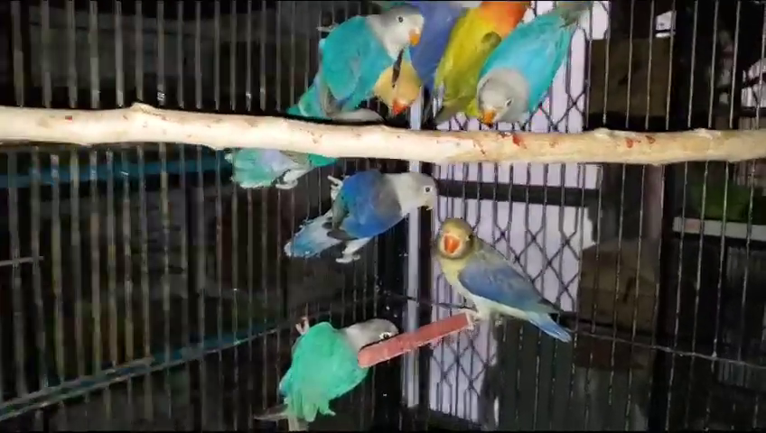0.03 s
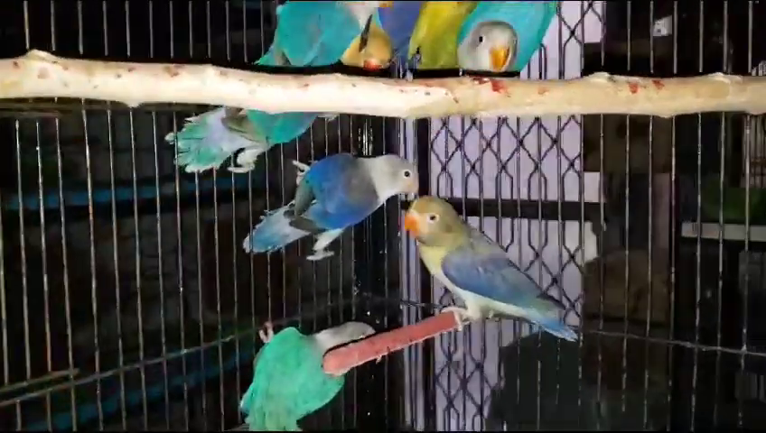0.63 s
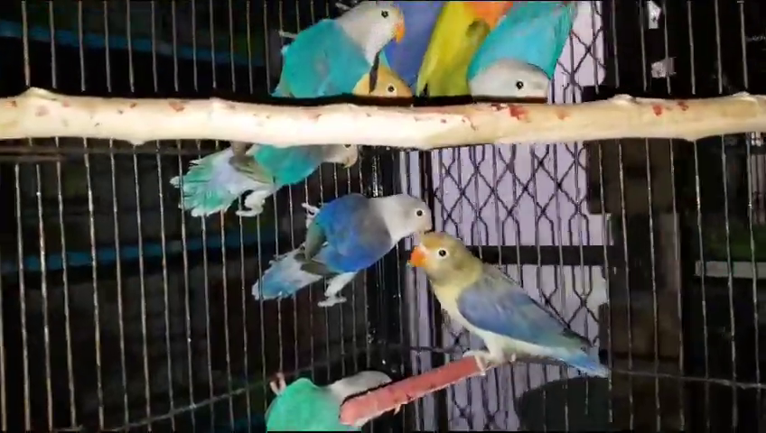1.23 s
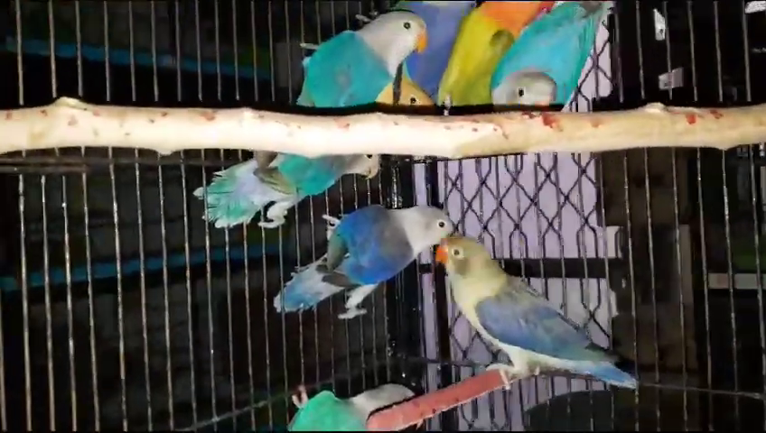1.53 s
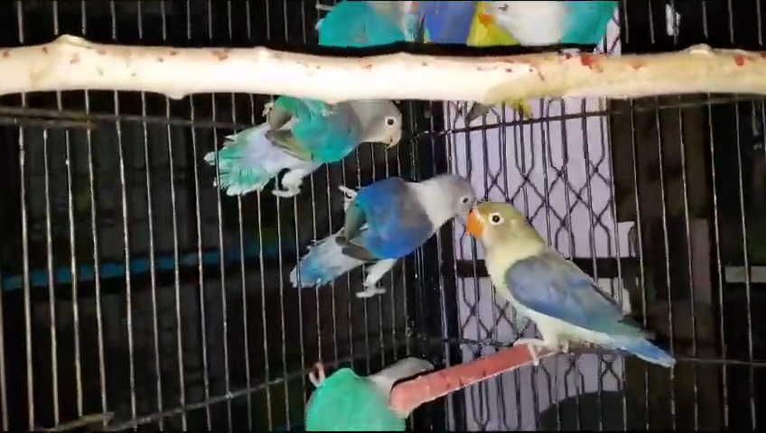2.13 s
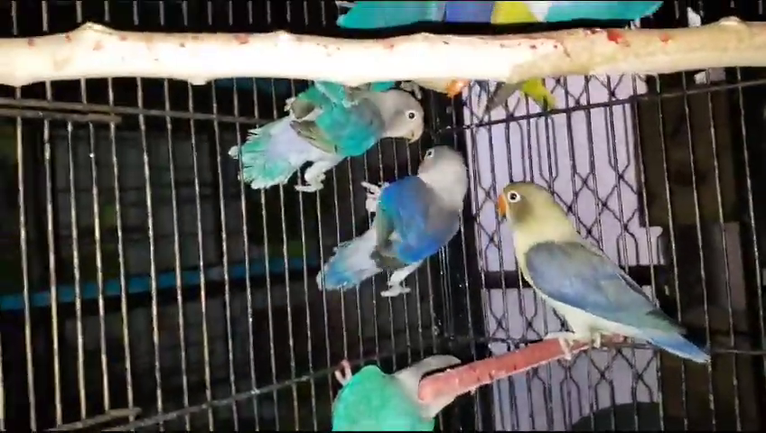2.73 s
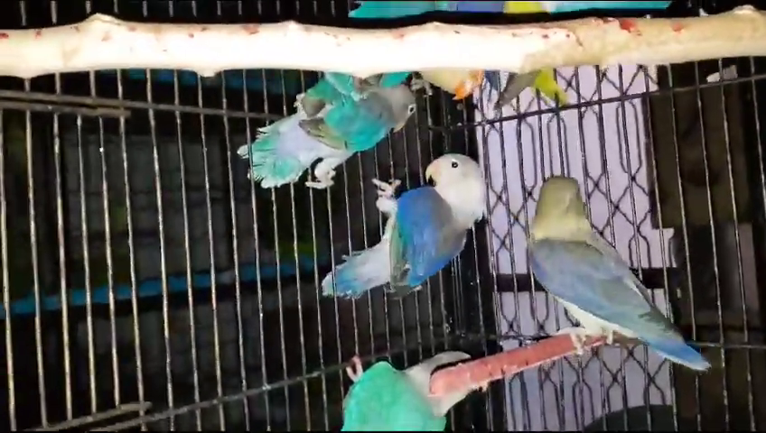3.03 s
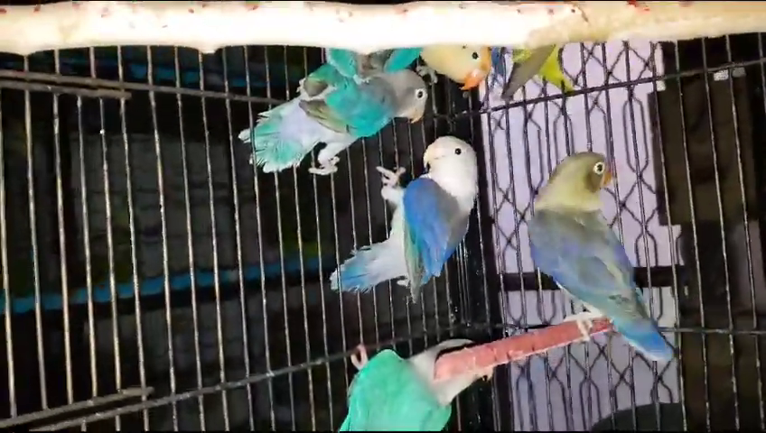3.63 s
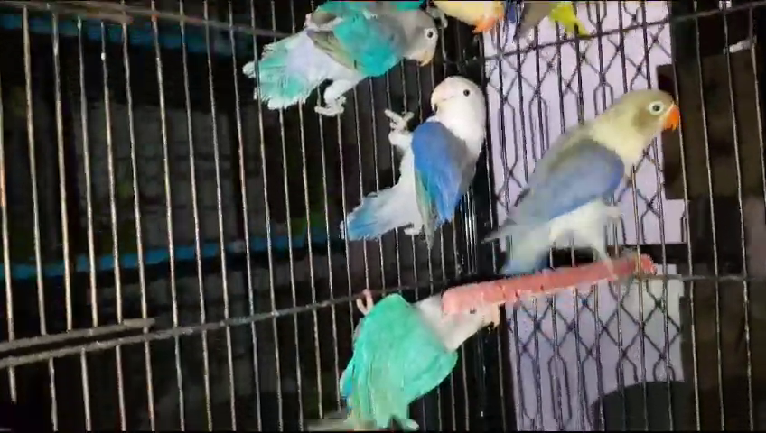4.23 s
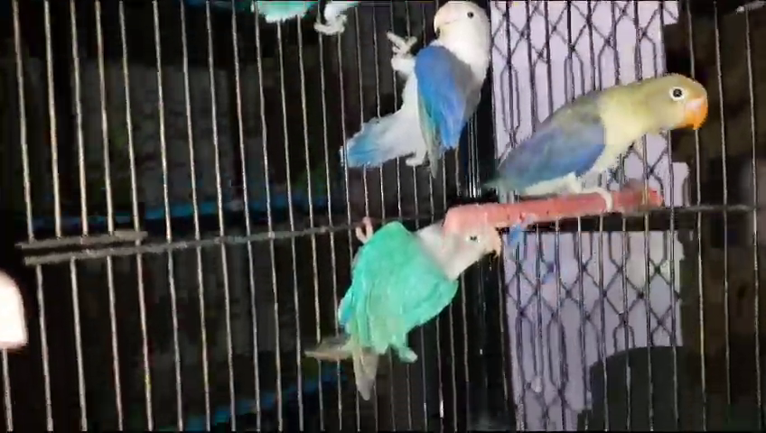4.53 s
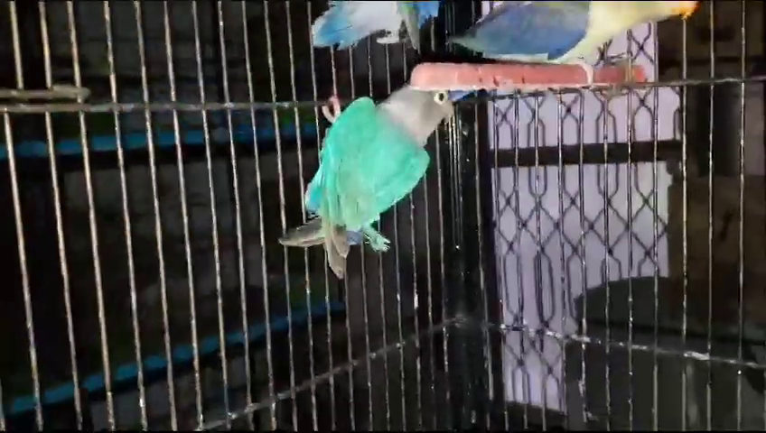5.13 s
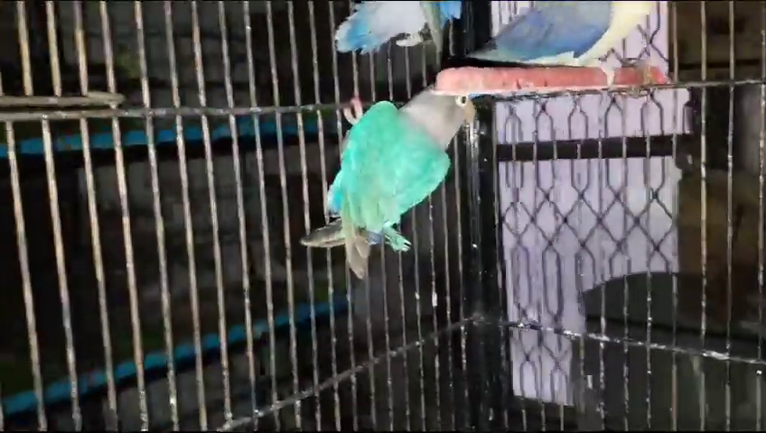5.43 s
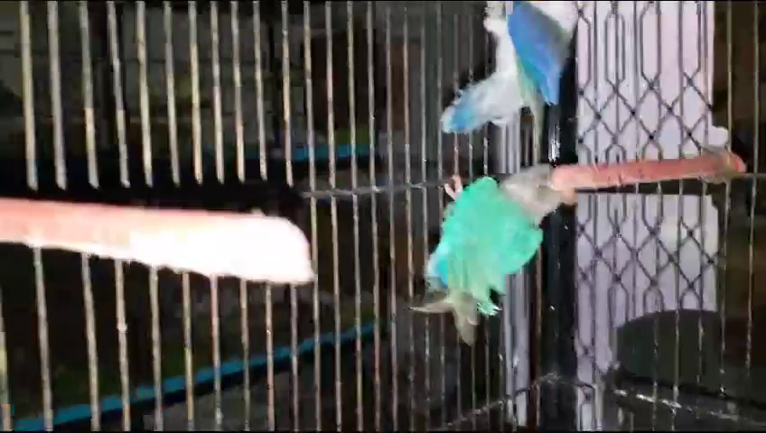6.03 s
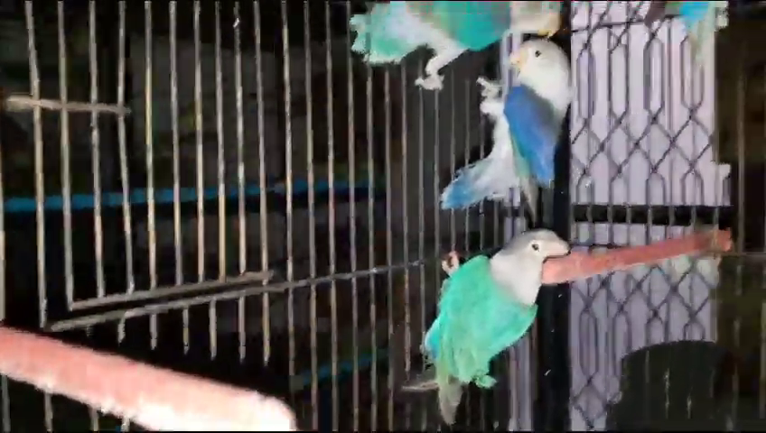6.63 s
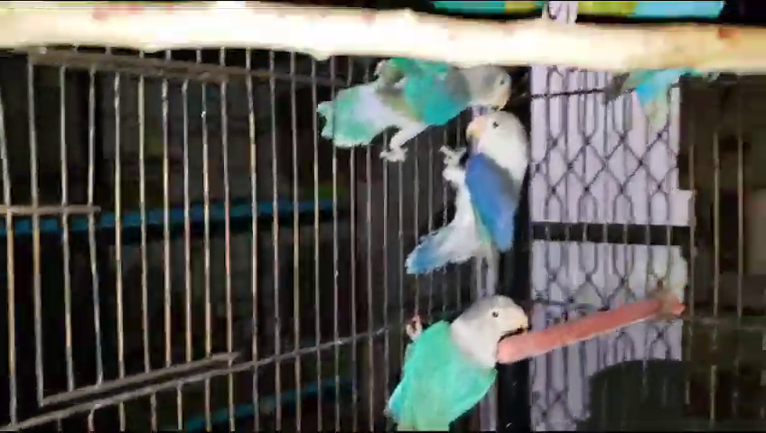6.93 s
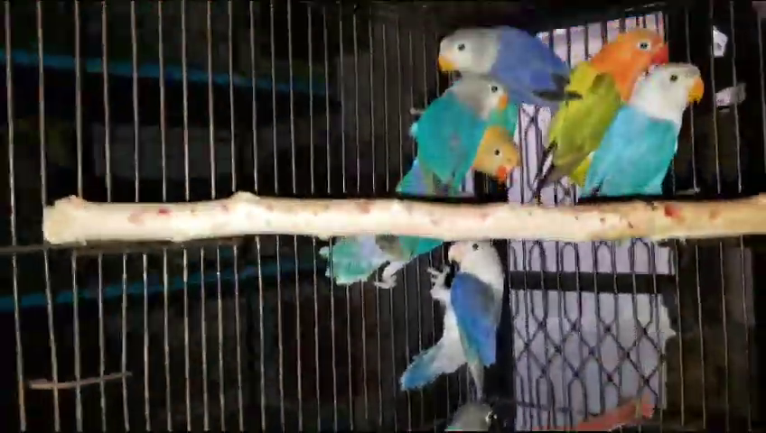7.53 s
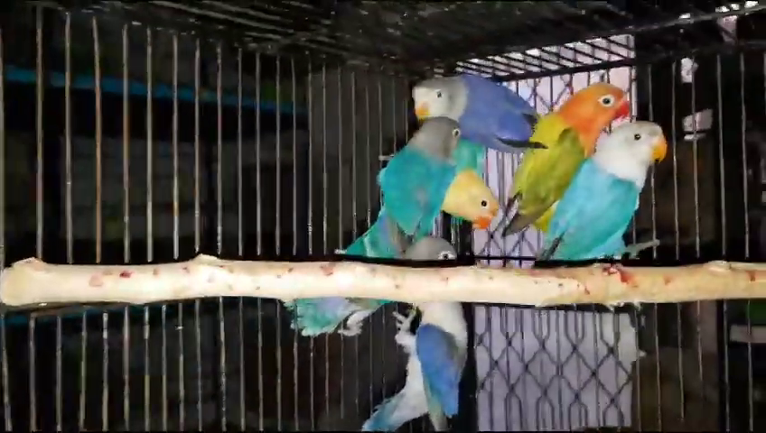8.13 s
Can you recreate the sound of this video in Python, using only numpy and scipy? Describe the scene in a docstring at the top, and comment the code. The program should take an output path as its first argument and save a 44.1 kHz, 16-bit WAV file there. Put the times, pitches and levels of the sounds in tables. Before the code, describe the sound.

Small parrots chirp shrilly in twos and threes in a wire cage, then flutter and tick against the bars after a low thud.

```python
"""Lovebirds chirp in a wire cage in a small hard room, close to a handheld camera.
Each bird's voice box (the syrinx) makes a high warbling tone: shrill rough chirps in twos and threes,
with soft peeps between them. Claws and beaks tick on the wire, wings flutter, and the room echoes.
A low hum, a rumble and a faint hiss run underneath, with two far whines and a clank of loose wire.
The camera is bumped once, giving a quick cluster of low thuds."""
import sys
import numpy as np
from scipy import signal
from scipy.fft import rfft, irfft, next_fast_len
from scipy.io import wavfile

SR = 44100
rng = np.random.default_rng(int(sys.argv[2]) if len(sys.argv) > 2 else 0)


def generate_wav(sig):
    """Save sig (samples, or channels by samples) to the path in sys.argv[1] as 16-bit PCM at SR."""
    pcm = np.round(np.clip(np.atleast_2d(sig).T, -1, 1) * 32767).astype(np.int16)
    wavfile.write(sys.argv[1], SR, pcm)


N = 369999
TIME = np.arange(N) / SR
TOP_HZ = 16000  # upper limit of the sound

# how strong the room noise is from low to high: frequency_hz, level_db_per_hz
ROOM_NOISE = [(20, -84.5), (35, -83), (52, -66), (80, -70), (130, -68), (200, -76), (310, -84),
              (550, -86.5), (1000, -94), (1800, -96), (3000, -105), (6000, -102), (10000, -105),
              (16000, -107)]
# how alike that noise is at the two microphones: frequency_hz, likeness_0_to_1
NOISE_LIKENESS = [(30, 0.4), (70, 0.85), (150, 0.95), (350, 0.74), (700, 0.38), (1500, 0), (8000, 0.1)]
# the hiss swells and fades: time_s, gain_db
HISS_SWELL = [(0, 0), (.5, -21), (.8, 4), (1.15, -3), (3.3, 2), (4.6, -5), (4.85, 5.5), (5.9, -11.5),
              (6.2, 0.5), (8.39, 2.5)]
# the tones of the hum: pitch_hz, gain_db
HUM_TONES = [(79, -1.5), (140, -15)]
# the hum slowly grows and shrinks: time_s, level_db
HUM_LEVEL = [(0, -44.5), (1.3, -53.5), (1.95, -42.5), (2.4, -47.5), (3.9, -43), (5.8, -55), (6.2, -46),
             (7, -55.5), (8.39, -43)]
# how long the room's echo takes to fall by 60 dB: frequency_hz, fade_s
ROOM_FADE = [(500, 0.28), (2500, 0.6), (5500, 0.47), (13000, 0.32)]
# faint far whines: start_s, length_s, pitch_hz, level_db
FAR_WHINES = [(4.28, 0.22, 1420, -61.5), (6.2, 0.45, 1355, -63.5)]
# a loose cage wire clanks: start_s, level_db, fade_s
WIRE_CLANKS = [(6.529, -46, 0.18)]
# thuds of the camera body: start_s, level_db, pitch_hz, fade_s
CAMERA_THUDS = [(6.082, -14.5, 72, 0.063), (6.133, -9.5, 80, 0.055), (6.18, -26, 47.3, 0.18),
                (6.273, -23, 76.7, 0.087)]
# bouts of fluttering and shuffling feathers: start_s, length_s, level_db
FLUTTER_BOUTS = [(2.878, 0.53, -81), (6.047, 0.086, -57), (6.925, 0.32, -56.5), (7.698, 0.61, -55.5)]
# tone colour of the feathers: frequency_hz, gain_db
FEATHER_COLOUR = [(60, 0), (300, 9), (1000, 6), (2500, 3), (6000, 0.5), (10000, 12), (16000, 2)]
# the loudest ticks on the wire and wing flicks: start_s, level_db
WIRE_TICKS = [(6.028, -31.5), (6.0748, -30), (6.13, -44), (6.42, -46.5), (6.477, -42), (6.5446, -36.5),
              (6.8351, -40.5), (6.8888, -39), (6.921, -38), (6.935, -31.5), (7.173, -36), (7.254, -44),
              (7.9024, -31.5), (7.9595, -37), (8.022, -41.5), (8.07, -31.5), (8.1183, -54), (8.135, -35.5),
              (8.1799, -32.5), (8.2255, -29.5), (8.2804, -34), (8.3529, -37.5)]
# tone colour of ticks and claw clicks: frequency_hz, gain_db
TICK_COLOUR = [(60, 8), (300, -3.5), (1000, 11.5), (2500, -2.5), (6000, 5), (10000, 5), (16000, 7.5)]
# harmonics of the voice box, where 1 is the base tone: pitch_multiple, level_db
VOICE_HARMONICS = [(1, -5), (2, 2), (3, -4), (4, -1.5), (5, -10), (6, -9), (7, -14.5), (8, -22)]
# tone colour that throat and beak give every call: frequency_hz, gain_db
BEAK_COLOUR = [(1300, -10.5), (1700, -4.5), (2200, -10), (2600, -4.5), (3100, -4.5), (3700, 1.5),
               (4900, -4), (5700, -1.5), (6600, -1.5), (7700, -5), (9500, -1), (13000, 3.5), (15500, -5)]
# soft peeps: start_s, length_s, effort_db, pitch_hz, glide_share_of_pitch, roughness_0_to_1, base_db
SOFT_PEEPS = [(0.807, 0.022, -55.5, 3230, 0.12, 0.15, 9), (.881, 0.026, -54.5, 2406, .03, 0.16, 14.5),
              (1.244, 0.02, -61, 2310, 0.1, 0.24, -13), (1.36, .016, -43.5, 2780, 0, 0.11, 1.5),
              (1.767, .024, -37.5, 2790, 0.00099, 0.1, -2.5), (1.848, .026, -37.5, 2907, .01, 0.12, -1),
              (3.068, 0.075, -64, 3330, -0.11, 0.15, 11), (3.608, 0.015, -45.5, 2918, 0, 0.08, 7),
              (3.686, .03, -39, 2219, 0.106, 0.35, -1.5), (3.837, 0.047, -58, 1696, 0.013, 0.2, 15),
              (4.163, 0.031, -58, 2350, -0.054, 0.17, 2), (4.311, 0.082, -64, 3185, -0.076, 0.15, 8.5),
              (5.462, 0.041, -35, 2198, 0.016, 0.16, -26), (5.468, 0.049, -48, 3110, 0.021, 0.04, 8)]
# shrill chirps, whose direct sound changes as the head turns:
# start_s, length_s, effort_db, pitch_hz, roughness_0_to_1, direct_db
SHRILL_CHIRPS = [(1.424, 0.041, -31, 3025, 0.55, 2.5), (1.523, 0.031, -26, 2930, 0.23, 0),
                 (1.638, 0.038, -27, 2945, 0.27, 2.5), (1.935, 0.025, -23.5, 2936, 0.27, 0.5),
                 (2.026, 0.034, -25.5, 2860, 0.22, 5), (2.128, 0.029, -24.5, 2858, .22, 4),
                 (2.428, 0.042, -31, 2937, 0.54, -2.5), (2.546, .047, -29, 2687, 0.2, 1),
                 (2.648, 0.04, -26, 2653, 0.19, -3), (4.956, 0.037, -25, 2995, 0.2, 4.5),
                 (5.038, 0.027, -23.5, 2854, 0.2, 5), (5.135, .036, -27, 2880, 0.24, 7.5),
                 (5.427, .038, -31.5, 2984, .2, 7.5), (6.961, 0.03, -28.5, 3015, 0.25, 6.5),
                 (7.067, 0.032, -26, 3044, 0.18, 4.5), (7.635, .03, -24, 2963, 0.24, 1),
                 (7.741, 0.032, -23.5, 2978, 0.21, -1)]
# tone colour of the left microphone opening: frequency_hz, gain_db
LEFT_COLOUR = [(200, -1), (1300, -3.5), (2300, -1.5), (4000, -1), (6000, -6.5), (8000, -6), (11000, -5),
               (13000, -5.5), (15500, 1.5)]
# the right opening faces the birds and rings: frequency_hz, gain_db
RIGHT_COLOUR = [(200, -1), (1200, 2.5), (3900, 7), (5400, 6.5), (6400, 8.5), (7400, -1), (8200, -2.5),
                (10600, -2.5), (12100, 14), (13200, 8.5), (14300, 10.5), (15500, -16.5)]


def amp(db):
    """Turns decibels into a number to multiply by."""
    return 10 ** (np.asarray(db) / 20)


def unit(x):
    """Scales a signal to an average (rms) size of 1."""
    return x / np.sqrt(np.mean(x ** 2) + 1e-20)


def look_up(table, hz):
    """Reads between the rows of a table on a logarithmic frequency scale."""
    row_hz, values = np.transpose(table)
    return np.interp(np.log(hz + 1), np.log(row_hz + 1), values)


def curve(table):
    """Joins the rows of a time table with straight lines."""
    return np.interp(TIME, *np.transpose(table))


def add(mix, start_s, sound):
    """Mixes a sound in at its start time."""
    part = mix[..., round(start_s * SR):][..., :sound.shape[-1]]
    part += sound[..., :part.shape[-1]]


def wander(size, hz):
    """A smooth random wobble of average size 1, mostly slower than hz."""
    length = next_fast_len(size, True)
    frequencies = np.fft.rfftfreq(length, 1 / SR)
    spectrum = rfft(rng.standard_normal(length)) / (1 + (frequencies / hz) ** 4)
    return unit(irfft(spectrum, length)[:size])


def colour(x, table, size=2048):
    """Turns each frequency up or down as the table says, with no ringing ahead of the sound."""
    hz = abs(np.fft.fftfreq(size, 1 / SR))
    log_gain = np.log(amp(look_up(table, hz)))
    taps = np.fft.ifft(np.exp(signal.hilbert(log_gain).conj())).real
    return signal.oaconvolve(x, taps[:size // 2])[:len(x)]


def direct_path(x, lag_s=0.000388):
    """Sound that travels straight reaches the left microphone a little after the right."""
    return np.array([np.interp(TIME - lag_s, TIME, x), x])


def room_echo(x, echoes_per_s=5000, gap_s=0.0035, early_db=4, early_s=0.0036):
    """Dense echoes, strongest from near walls and the cage tray; each use draws a new pattern."""
    size = SR * 3 // 4
    echoes = rng.standard_normal((2, size)) * (rng.random((2, size)) < echoes_per_s / SR)
    hz, t, bands = signal.stft(echoes, SR, nperseg=256)
    fade = amp(-60 * t / look_up(ROOM_FADE, hz)[:, None])
    tail = signal.istft(bands * fade, SR, nperseg=256)[1]
    t = np.arange(tail.shape[1]) / SR
    tail *= np.clip(t / gap_s - .5, 0, 1) * amp(early_db * np.exp(-t / early_s))
    tail /= np.linalg.norm(tail, axis=1, keepdims=True)
    return signal.fftconvolve(x[None], tail, axes=1)[:, :N]


def rumble_and_hiss(split_hz=2500, rumble_db=1, draught=260, flicker_db=2.4):
    """Room noise: a low rumble that swells with the draught of beating wings, and a flickering hiss."""
    size = next_fast_len(N, True)
    hz = np.fft.rfftfreq(size, 1 / SR)
    left, other = rfft(rng.standard_normal((2, size)))
    likeness = np.clip(look_up(NOISE_LIKENESS, hz), 0, 1)
    right = likeness * left + np.sqrt(1 - likeness ** 2) * other
    spectrum = np.array([left, right]) * amp(look_up(ROOM_NOISE, hz)) * np.sqrt(SR / 2)
    treble = hz ** 2 / (hz ** 2 + split_hz ** 2)
    rumble = irfft(spectrum * (1 - treble), size)[:, :N] * amp(rumble_db)
    hiss = irfft(spectrum * treble, size)[:, :N] * amp(curve(HISS_SWELL) + flicker_db * wander(N, 32))
    return rumble * (1 + draught * flutter_strength()) + hiss


def hum(waver_db=3, waver_hz=6.4, motor_hz=366, motor_db=-67, motor_db_per_s=-0.64):
    """A low wavering hum, and a thin motor tone that slowly fades."""
    level_db = curve(HUM_LEVEL) + waver_db * wander(N, waver_hz)
    tones = sum(amp(level_db + db) * np.sin(2 * np.pi * hz * TIME + 1.79 * wander(N, 5.7))
                for hz, db in HUM_TONES)
    motor = np.sin(2 * np.pi * motor_hz * TIME + 0.32 * wander(N, 1.5))
    motor *= amp(motor_db + motor_db_per_s * TIME)
    return np.sqrt(2) * direct_path(tones + motor)


def far_whines(rise_hz_per_s=410, upper_ratio=1.4, wobble=0.027):
    """Each faint whine is two unsteady notes rising together."""
    out = np.zeros(N)
    for start_s, length_s, hz, db in FAR_WHINES:
        t = np.arange(int(length_s * SR)) / SR
        pitch_hz = (hz + rise_hz_per_s * t) * (1 + wobble * wander(len(t), 92))
        phase = 2 * np.pi * np.cumsum(pitch_hz) / SR
        notes = np.sin(phase) + np.sin(upper_ratio * phase)
        add(out, start_s, amp(db) * signal.windows.tukey(len(t), .5) * notes)
    return out


def wire_clank(band_hz=(1450, 2150)):
    """A loose cage wire rings as a narrow band of noise that dies away."""
    out, t = np.zeros(N), np.arange(SR // 4) / SR
    for start_s, db, fade_s in WIRE_CLANKS:
        ring = signal.lfilter(*signal.butter(2, band_hz, "band", fs=SR), rng.standard_normal(len(t)))
        add(out, start_s, amp(db - 60 * t / fade_s) * unit(ring))
    return out


def camera_bump(rise_s=0.0083):
    """A bump shakes the camera, and each low swing quickly dies away."""
    out, t = np.zeros(N), np.arange(SR // 2) / SR
    rise = 1 - np.exp(-t / rise_s)
    for start_s, db, hz, fade_s in CAMERA_THUDS:
        add(out, start_s, rise * amp(db - 60 * t / fade_s) * np.sin(2 * np.pi * hz * t))
    return out


def flutter_strength(resting_db=-86.5, build_db_per_s=309, settle_db_per_s=160):
    """How hard the feathers move: bouts build, hold and settle over the slight stir of perched birds."""
    strength = amp(resting_db)
    for start_s, length_s, db in FLUTTER_BOUTS:
        before_s = np.maximum(start_s - TIME, 0)
        after_s = np.maximum(TIME - start_s - length_s, 0)
        strength = strength + amp(db - build_db_per_s * before_s - settle_db_per_s * after_s)
    return strength


def feather_rustle(beat_hz=19.5, beat_db=4, soft_hz=1300, soft_db=-4, crisp_db=-17, clump_db=12):
    """Feathers brush in quick beats: soft noise with crisp clumps on top."""
    beats = amp(beat_db * np.sin(2 * np.pi * beat_hz * TIME + wander(N, 14)))
    soft = unit(signal.lfilter(*signal.butter(1, soft_hz, fs=SR), rng.standard_normal(N)))
    crisp = amp(crisp_db + clump_db * wander(N, 160)) * rng.standard_normal(N)
    return colour(flutter_strength() * beats * (amp(soft_db) * soft + crisp), FEATHER_COLOUR)


def claw_clicks(clicks_per_s=45, size_db=10, spread_db=4, decay_s=0.00073):
    """Shifting feet make small uneven clicks, louder while the birds flutter."""
    sizes = amp(size_db + spread_db * np.minimum(rng.exponential(1, N), 4))
    hits = sizes * (rng.random(N) < clicks_per_s / SR) * flutter_strength()
    t = np.arange(SR // 200) / SR
    click = rng.standard_normal(len(t)) * np.exp(-t / decay_s)
    return colour(signal.oaconvolve(hits, click / np.linalg.norm(click))[:N], TICK_COLOUR)


def wire_ticks(lead_s=.008, catch_db=-14, catch_s=0.0052, snap_s=0.0013, scrape_db=-17, scrape_s=0.0099,
               ring_db=-17, ring_s=0.01, ring_hz=(3000, 13000)):
    """A claw or feather catches, snaps free and scrapes; each wire pings at three pitches of its own."""
    out = np.zeros(N)
    t = np.arange(SR // 16) / SR - lead_s  # zero at the snap
    catch = amp(catch_db) * np.exp(-abs(t) / catch_s)
    release = np.exp(-abs(t) / snap_s) + amp(scrape_db) * np.exp(-abs(t) / scrape_s)
    shape = np.where(t < 0, catch, release)
    for start_s, db in WIRE_TICKS:
        ping = sum(np.sin(2 * np.pi * hz * t) for hz in rng.uniform(*ring_hz, 3))
        ping *= amp(ring_db) * (t > 0) * np.exp(-abs(t) / ring_s)
        add(out, start_s - lead_s, amp(db) * (rng.standard_normal(len(t)) * shape + ping))
    return colour(out, TICK_COLOUR)


def cage_echoes(x, echo_db=-10, delay_range_s=(.0008, 0.0088), count=4):
    """Perch, tray and cage wall add echoes to a sound within a few milliseconds."""
    out = np.pad(x, (0, SR // 100))
    for delay_s in rng.uniform(*delay_range_s, count):
        add(out, delay_s, amp(echo_db) * rng.choice([-1, 1]) * x)
    return out / np.sqrt(1 + count * amp(echo_db) ** 2)


def voice_box(length_s, effort_db, pitch_hz, glide, roughness, base_db, upper_db,
              warble_hz=110, scoop_s=0.00702, break_s=0.0037, swell_s=0.0089, flicker_db=5.5):
    """One call: the pitch scoops up, then warbles in quick arches; pressed hard, it jitters and rasps."""
    t = np.arange(int(length_s * SR)) / SR
    pressure = min(roughness, .24)
    cycle = np.cumsum(warble_hz * (1 + 0.294 * wander(len(t), 68.5))) / SR % 1
    arches = np.sin(np.pi * cycle ** 1.3)  # each climbs slowly and drops fast
    warble = 1.25 * pressure * (arches - arches.mean())
    rasp = roughness * (1 - np.exp(-np.square(t / break_s)))
    jitter = 0.12 * rasp * wander(len(t), 555)
    scoop = .3 * pressure * np.exp(-t / scoop_s)
    bend = glide * (t / length_s - .5) + warble + jitter - scoop
    phase = 2 * np.pi * np.cumsum(pitch_hz * (1 + bend)) / SR
    # the harder a call is pressed, the weaker its overtones start before they swell in
    swell = unit(amp(-60 * pressure * np.clip(1 - t / swell_s, 0, 1)))
    voice = np.zeros(len(t))
    for multiple, db in VOICE_HARMONICS:
        if multiple * pitch_hz < TOP_HZ:
            gain = amp(db + base_db) if multiple == 1 else swell * amp(db + upper_db * (multiple > 2))
            voice += gain * np.sin(multiple * phase)
    voice *= 1 + rasp * wander(len(t), 2000)
    loudness = amp(flicker_db * wander(len(t), 160)) * signal.windows.tukey(len(t), .07)
    loudness *= np.clip((length_s - t) / (0.19 * length_s), 0, 1) ** .5  # the end fades out
    return amp(effort_db) * voice * unit(loudness)


def chirps_and_peeps(usual_db=-26.5, usual_hz=2870, peep_direct_db=2.5):
    """Gives each call as (start_s, direct_db, sound), with its harmonics balanced to suit it."""
    for start_s, length_s, effort_db, hz, roughness, direct_db in SHRILL_CHIRPS:
        base_db = -11 - 0.55 * (effort_db - usual_db)  # more effort thins the base tone
        upper_db = -8 + 12.5 * np.log2(hz / usual_hz)  # a higher chirp is brighter
        yield start_s, direct_db, voice_box(length_s, effort_db, hz, 0, roughness, base_db, upper_db)
    for start_s, length_s, effort_db, hz, glide, roughness, base_db in SOFT_PEEPS:
        upper_db = -9.5 + 33.5 * np.log2(usual_hz / hz)  # a lower peep is brighter
        peep = voice_box(length_s, effort_db, hz, glide, roughness, base_db, upper_db)
        yield start_s, peep_direct_db, peep


def lovebirds(straight_db=-2, room_db=3):
    """Every call leaves the beak and arrives straight, off the cage and by way of the room."""
    direct, echoes = np.zeros(N), np.zeros((2, N))
    for start_s, direct_db, voice in chirps_and_peeps():
        call = colour(np.pad(voice, (0, SR // 200)), BEAK_COLOUR)
        add(direct, start_s, cage_echoes(call) * amp(direct_db))
        add(echoes, start_s, room_echo(call))
    return amp(straight_db) * direct_path(direct) + amp(room_db) * echoes


def scene():
    """Birds and cage sounds in the room, with the bump and the background."""
    cage = wire_ticks() + feather_rustle() + claw_clicks()
    birds = lovebirds() + amp(3.5) * direct_path(cage)
    echoes = room_echo(amp(-3.5) * cage + far_whines() + wire_clank())
    return birds + echoes + camera_bump() + rumble_and_hiss() + hum()


def record(dry):
    """Each microphone opening colours its side, then the highest treble is cut off."""
    stereo = np.array([colour(dry[0], LEFT_COLOUR), colour(dry[1], RIGHT_COLOUR)])
    treble_cut = signal.firwin(255, TOP_HZ, window=("kaiser", 9), fs=SR)
    return signal.oaconvolve(stereo, treble_cut[None], "same")


dry = scene()
out = record(dry)
generate_wav(out)
```